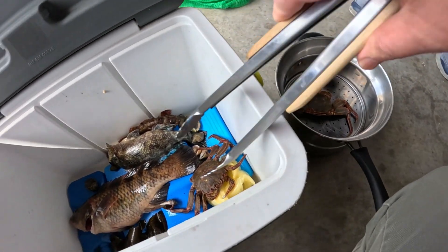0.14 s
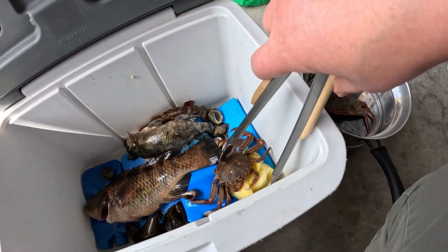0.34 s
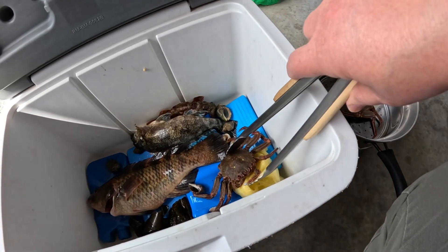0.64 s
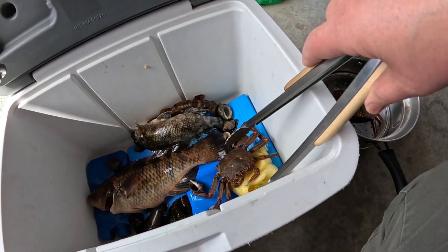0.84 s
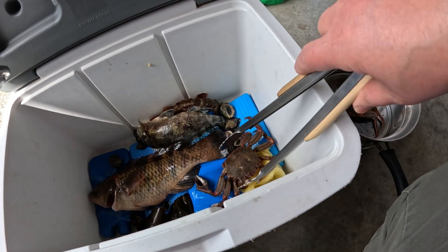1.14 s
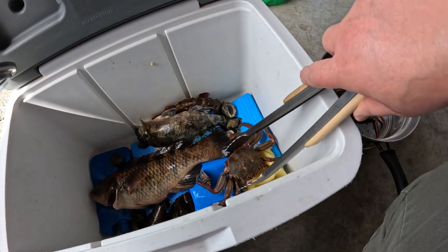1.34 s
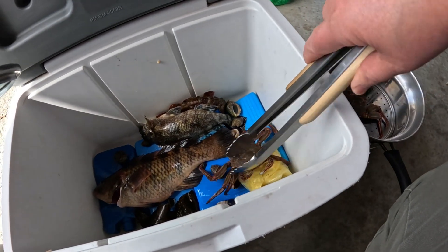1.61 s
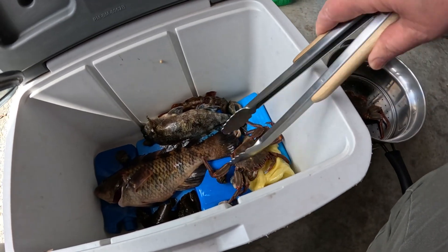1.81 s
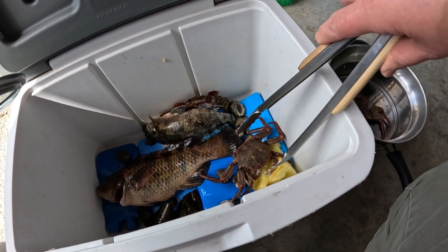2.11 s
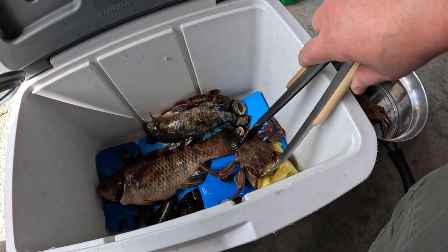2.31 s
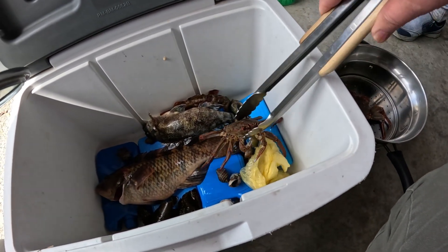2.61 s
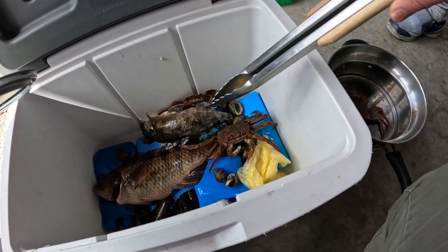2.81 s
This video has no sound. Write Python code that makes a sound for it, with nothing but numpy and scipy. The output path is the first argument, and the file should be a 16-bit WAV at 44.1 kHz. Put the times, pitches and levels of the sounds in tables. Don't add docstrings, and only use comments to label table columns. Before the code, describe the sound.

Close stereo sound of steel tongs chasing a crab in an open cooler: irregular dull thuds and small ticks first, a sharp scrape and ringing snap midway, two more thuds, then thin metallic scratches and chatter.

```python
import sys
import numpy as np
from scipy import signal
from scipy.fft import rfft, irfft, next_fast_len
from scipy.io import wavfile
from scipy.ndimage import map_coordinates

SR = 44100
rng = np.random.default_rng(int(sys.argv[2]) if len(sys.argv) > 2 else 0)


def ratio(d):
    e = np.asarray(d, float) / 20
    return 10 ** e


def log_audio(samples):
    frames = np.atleast_2d(samples).T
    limited = np.clip(frames, -1, 1)
    pcm = np.round(limited * 32767).astype(np.int16)
    wavfile.write(sys.argv[1], SR, pcm)


N = 130095

# frequency in Hz, level in dB.
RUMBLE_COLOUR = [(15, -6), (45, 0), (110, -9), (250, -84)]
# start in seconds, peak level in dB.
JOLTS = [
    (0.389, -27),
    (1.621, -23),
    (1.741, -20.5),
    (2.82, -26),
]
# frequency in Hz, likeness from 0 to 1.
LIKENESS = [(400, 0.93), (1500, 0.76), (6000, 0.8), (12000, 0.83)]
# time in seconds, shifting, dull rustle and fine rustle in dB.
UNREST = [(0, -47.5, -43.5, -55.5), (.19, -42, -42.5, -56.5), (.24, -28.5, -45, -65.5),
          (.42, -31, -53.5, -50), (0.622, -43.5, -51.5, -50), (0.862, -43, -64, -48.5),
          (1.041, -45, -60, -55), (1.2, -42.5, -45, -44), (1.35, -42.5, -53, -55), (1.701, -34, -54, -47),
          (1.839, -42.5, -50, -52.5), (1.946, -54, -73, -64.5), (2.05, -35, -53.5, -62.5),
          (2.237, -34, -57, -60.5), (2.33, -27, -46.5, -46.5), (2.62, -45, -55, -51.5),
          (2.95, -42.5, -46, -54)]
# frequency in Hz, level in dB.
DULL_RUSTLE_COLOUR = [(220, -8), (380, -4), (1030, -1), (2100, -12.5), (3290, -20), (6000, -25.5),
                      (7800, -31.5), (13200, -120)]
# frequency in Hz, level in dB.
FINE_RUSTLE_COLOUR = [(900, -13), (1500, -1), (2200, -9), (3200, -0.5), (9500, -12), (13000, -24),
                      (15500, -61)]
# start in seconds, peak level in dB, damping factor (no unit).
KNOCKS = [(0.209, -1, 0.83), (0.341, 1, 1.3), (0.392, -12, 0.44), (0.504, -17.5, 0.53), (0.529, -17.5, 2),
          (0.601, -20.5, 0.5), (0.696, -15, 1.2), (0.824, -29.5, 1.8), (0.903, -17, 0.76),
          (1.152, -23, 1.26), (1.265, 1.5, 1.37), (1.323, -18.5, 1.05), (1.358, -30, 1.8),
          (1.434, -14, 1.2), (1.449, -2.5, 1.06), (1.523, -19.5, 1.2), (1.614, -20.5, 1.1),
          (1.688, -19.5, 1.1), (1.74, -23.5, 1), (1.974, -2.5, 0.93), (2.14, -1.5, 0.92),
          (2.326, -19, 0.67), (2.348, -14.5, 0.84), (2.362, -23, 0.77), (2.821, -18, 0.85)]
# frequency in Hz, level in dB, 60 dB fade in seconds.
WALL_TONES = [(185.4, -32, 0.78), (220.06, -1.5, 0.23), (232.4, 0.5, .1), (266.5, 2.5, 0.051),
              (290, -4.5, 0.086), (325, -40, 0.45), (624, -19, 0.058), (405, -7, 0.034), (728, -29, 0.1),
              (972, -18.5, 0.046)]
# start in seconds, level in dB.
SWAYS = [(0.213, -12), (0.346, -20.5), (.699, -22.5), (0.902, -10.5), (1.324, -29), (1.451, -17),
         (1.975, -9.5), (2.142, -14.5), (2.351, -27)]
# start in seconds, level in dB, pitch in Hz, 60 dB fade in seconds.
CLAW_TAPS = [
    (2.893, -19, 392, 0.14),
]
# start in seconds, peak level in dB, pitch in Hz.
SHELL_TAPS = [(0.208, -9.5, 1000), (0.341, -22.5, 775), (0.389, -24.5, 1150), (0.404, -22.5, 1530),
              (0.428, -31.5, 1980), (0.902, -16, 1290), (0.919, -22.5, 1730), (1.193, -30.5, 1000),
              (1.266, -23.5, 960), (1.436, -23.5, 890), (1.449, -21.5, 970), (1.519, -24.5, 1230),
              (1.614, -21, 1020), (1.973, -15.5, 1680), (1.996, -29, 1190), (2.139, -18, 1230),
              (2.352, -24, 700), (2.579, -27.5, 1510), (2.653, -33.5, 1720), (2.821, -24, 1050),
              (2.919, -24.5, 2700)]
# frequency in Hz, level in dB.
DULL_COLOUR = [(300, -41), (700, 3), (1200, 5), (1800, -0.5), (3400, -2.5), (9250, -22), (15000, -59)]
# start in seconds, peak level in dB.
TICKS = [(0.39, -11), (0.4918, -21), (0.5943, -19), (0.6916, -23), (1.0683, -19.5), (1.0752, -13.5),
         (1.1303, -17), (1.1564, -16), (1.3232, -23), (1.5193, -8.5), (1.534, -16), (1.5732, -34),
         (1.7845, -24), (2.6279, -19.5), (2.9188, -25), (.111, -32), (.407, -20.5), (.43, -25),
         (1.484, -25)]
# frequency in Hz, level in dB.
BRIGHT_COLOUR = [(290, -38), (500, -1.5), (843, -11), (1020, 2), (2070, -4.5), (3250, 1), (7210, 2.5),
                 (12100, -13.5), (16400, -57.5)]
# start in seconds, length in seconds, level in dB, change in dB.
STROKES = [(1.588, 0.034, -28.5, 0), (1.615, .02, -34.5, -4), (1.64, 0.067, -29.5, -3.5),
           (1.701, 0.047, -40.5, -4), (2.284, 0.033, -47.5, 6.5), (2.344, 0.016, -36.5, -11),
           (2.44, 0.021, -28, 1), (2.463, 0.047, -47, 14.5), (2.516, 0.066, -29.5, -18.5),
           (2.675, 0.014, -34, -7), (2.688, 0.063, -32, -1.5), (2.744, 0.051, -37.5, -10.5),
           (2.804, 0.074, -49, -3.5)]
# start in seconds, peak level in dB, pitch in Hz.
CATCHES = [(0.2083, -14, 4150), (1.5762, -14.5, 5270), (1.5874, -13, 5100), (1.5914, -19, 5870),
           (1.6002, -7, 6590), (1.6085, -21, 6480), (1.6142, -12, 6200), (1.6369, -12, 4380),
           (1.6415, -9.5, 6700), (1.6567, -21, 7250), (1.672, -15, 6920), (1.6785, -4.5, 4960),
           (1.6826, -13, 5870), (1.6869, -5, 3750), (2.2842, -21.5, 9500), (2.3156, -24, 6900),
           (2.3336, -22, 4230), (2.3461, -35, 7290), (2.3537, -21, 5300), (2.3632, -17.5, 4100),
           (2.408, -38, 5720), (2.4244, -24, 5530), (2.4448, -15, 6440), (2.4478, -9, 8500),
           (2.4529, -5.5, 6000), (2.456, -24, 6290), (2.4844, -18, 9360), (2.4904, -22, 7740),
           (2.4966, -17, 3600), (2.5197, -20, 6390), (2.5338, -17, 7430), (2.556, -23, 7360),
           (2.6741, -18.5, 6800), (2.6848, -15, 7600), (2.6934, -14, 6300), (2.6977, -9.5, 8000),
           (2.7048, -18, 4460), (2.7074, -13.5, 7200), (2.713, -16, 6790), (2.7262, -5.5, 7800),
           (2.73, -19, 3500), (2.7376, -2, 3460), (2.7583, -11, 3530), (2.8195, -40, 3660),
           (2.8346, -17, 4500), (2.8492, -17.5, 4700), (2.8573, -17, 4650), (2.8664, -24.5, 5000),
           (2.8847, -28, 4980)]
# frequency in Hz, level in dB.
TEETH_TONES = [(4330, 2.5), (4800, 1), (5280, -6), (6000, -1), (6700, 4), (7300, 3), (7890, -1), (9380, 0),
               (11800, -1)]
# frequency in Hz, level in dB.
ARM_TONES = [(3240, 0), (3400, -4), (3470, -6), (3640, -5), (3775, -7), (4126, -8), (4380, -4), (5290, -11),
             (6290, -13), (6620, -11)]
# start in seconds, peak level in dB.
SNAPS = [(1.702, -9.5), (2.6997, -24), (2.7117, -21.5), (2.7308, -10.5), (2.738, -27), (2.7502, -27),
         (2.7604, -17), (2.768, -24.5)]
# frequency in Hz, 60 dB fade in seconds.
BOX_ECHO = [(300, 0.2), (1000, 0.097), (4000, 0.042), (14000, 0.049)]
# frequency in Hz, level in dB.
SPREAD_COLOUR = [(1500, -41), (5000, -7), (9000, -16.5), (13000, 0.5)]
# frequency in Hz, level in dB.
MIC_COLOUR = [(9700, 1), (10200, -8.5), (14500, 1.5), (16400, -21)]


def unit(x):
    return x / np.sqrt(np.mean(x ** 2) + 1e-20)


def seconds_axis(length):
    return np.arange(length) / SR


def along(points, hz):
    f, value = np.transpose(points)
    return np.interp(np.log(hz + 1), np.log(f + 1), value)


def wobble(rate):
    knots = rng.standard_normal(int(N * rate / SR) + 4)
    return map_coordinates(knots, [np.arange(N) * rate / SR])


def filtered(x, response):
    m = next_fast_len(N + SR // 2)
    return irfft(rfft(x, m) * response(np.fft.rfftfreq(m, 1 / SR)), m)[..., :N]


def causal(points):
    level = ratio(along(points, np.fft.rfftfreq(2048, 1 / SR)))
    cepstrum = irfft(np.log(level + 1e-6))
    cepstrum[1:1024] *= 2
    cepstrum[1025:] = 0
    click = irfft(np.exp(rfft(cepstrum)))[:1024]
    return click / np.linalg.norm(click)


def through(x, answer):
    return signal.fftconvolve(x, answer)[:N]


def add(track, s, sound):
    part = track[max(round(s * SR), 0):][:len(sound)]
    part += sound[:len(part)]


def ring(hz, db, t60, seconds):
    t = seconds_axis(int(seconds * SR))
    return ratio(db[:, None] - 60 * t / t60[:, None]) * np.sin(2 * np.pi * hz[:, None] * t)


def tone(hz, db, t60, rise_s):
    t = seconds_axis(SR // 2)
    return ratio(db - 60 * t / t60) * (1 - np.exp(-t / rise_s)) * np.sin(2 * np.pi * hz * t)


def rush(spectrum):
    def shares(hz):
        turn = np.arccos(np.clip(along(LIKENESS, hz), -1, 1)) / 2
        return ratio(along(spectrum, hz)) * np.array([np.cos(turn), np.sin(turn)])

    mid, side = filtered(rng.standard_normal((2, N)), shares)
    return unit(np.array([mid + side, mid - side]))


def unrest(column):
    rows = np.transpose(UNREST)
    return np.interp(seconds_axis(N), rows[0], rows[column])


def bursts(events, colour, trim_db, t60):
    out, t = np.zeros(N), seconds_axis(SR // 10)
    for s, db in events:
        noise = rng.standard_normal(len(t))
        add(out, s, ratio(db + trim_db - 60 * t / t60) * (1 - np.exp(-t / 0.0019)) * noise)
    return through(out, causal(colour))


def pitched_bursts(events, colour, trim_db, t60, sharpness, broad_db):
    out, t = np.zeros(N), seconds_axis(2048)
    f = np.fft.rfftfreq(len(t), 1 / SR)
    envelope = ratio(-60 * t / t60) * (1 - np.exp(-t / 0.00058))
    for s, db, hz in events:
        burst = rng.standard_normal(len(t)) * envelope
        width = 1j * f * hz / sharpness
        peak = width / (hz * hz - f * f + width)
        add(out, s, ratio(db + trim_db) * irfft(rfft(burst) * (peak + ratio(broad_db))))
    return through(out, causal(colour))


def camera():
    level_db = -59.5 + 0.32 * (unrest(1) + 47.5) + 3.3 * wobble(4.56)
    out = ratio(level_db) * rush(RUMBLE_COLOUR)[0]
    for s, db in JOLTS:
        add(out, s, tone(47.2, db + 1.0, t60=0.07, rise_s=0.0041))
    return out


def dull_rustle():
    return ratio(unrest(2) + 0.98 * wobble(25.65)) * rush(DULL_RUSTLE_COLOUR)


def leg_rustle():
    return ratio(unrest(3) + 2.9 * wobble(140)) * rush(FINE_RUSTLE_COLOUR)


def knocks():
    push_s, lag_s, trim_db = 0.0033, 0.00244, -7
    scatter_db, detune, slap_db = 1.4, 0.016, 0.5
    slap_hz, slap_s, slap_width_s = 235.8, 0.0064, 0.0033
    out, t = np.zeros(N), seconds_axis(SR // 2)
    hz, mode_db, t60 = np.transpose(WALL_TONES)
    push = 1 - np.exp(-(t / push_s) ** 2)
    slap = np.exp(-((t - slap_s) / slap_width_s) ** 2) * np.sin(2 * np.pi * slap_hz * t)
    for s, db, damping in KNOCKS:
        level_change, pitch_change = rng.standard_normal((2, len(WALL_TONES)))
        tones = ring(hz * (1 + detune * pitch_change), mode_db + scatter_db * level_change,
                     t60 / max(damping, .3), .5).sum(0)
        add(out, s + lag_s, ratio(db + trim_db) * push * tones)
        add(out, s + lag_s, ratio(db + trim_db + slap_db) * slap)
    return out


def shifting():
    hz, mode_db, t60 = np.transpose(WALL_TONES)
    nudges = rng.standard_normal(N) * ratio(3.2 * wobble(39.99))
    hum = through(nudges, ring(hz, mode_db, t60 / 1.5, 0.45).sum(0))
    return ratio(unrest(1)) * unit(hum)


def box():
    out = knocks() + shifting()
    for s, db in SWAYS:
        add(out, s, tone(138, db, t60=0.3, rise_s=0.022))
    for s, db, hz, t60 in CLAW_TAPS:
        add(out, s, tone(hz, db - 5.5, t60, rise_s=0.00082))
    wall_cut_hz = 94
    return filtered(out, lambda f: (1j * f / (1j * f + wall_cut_hz)) ** 4)


def inside(x):
    hz, _, noise = signal.stft(rng.standard_normal((2, SR // 4)), SR, nperseg=128)
    _, t, _ = signal.stft(np.zeros(SR // 4), SR, nperseg=128)
    fading = noise * ratio(-60 * t / along(BOX_ECHO, hz)[:, None])
    tail = signal.istft(fading, SR, nperseg=128)[1]
    delayed = np.pad(x, (40, 0))[None]
    return signal.fftconvolve(delayed, tail / np.linalg.norm(tail[0]), axes=1)[:, :N]


def spread(x):
    t = seconds_axis(SR // 50)
    scatter = rng.standard_normal(len(t)) * np.exp(-t / 0.003)
    scattered = through(x, scatter / np.linalg.norm(scatter))
    return filtered(scattered, lambda hz: ratio(along(SPREAD_COLOUR, hz))) * np.array([[1], [-1]])


def shell_taps():
    return pitched_bursts(SHELL_TAPS, DULL_COLOUR, trim_db=1.0, t60=0.021, sharpness=2.83, broad_db=-4.5)


def leg_ticks():
    return bursts(TICKS, BRIGHT_COLOUR, trim_db=-6.5, t60=0.021)


def arms():
    hz, db = np.transpose(ARM_TONES)
    t60 = .039 * (hz[1] / hz) ** 2.1
    t = seconds_axis(int(.1 * SR))
    answer = ring(hz, db, t60, .1).sum(0) * (1 - np.exp(-t / .0004))
    return answer / np.linalg.norm(answer)


def teeth():
    hz, db = np.transpose(TEETH_TONES)
    answer = ring(hz, db, np.full(len(hz), 0.011), .05).sum(0)
    return answer / np.linalg.norm(answer)


def swish():
    brush = np.exp(-((seconds_axis(N) - 2.11) / .03) ** 2) * rng.standard_normal(N)
    return through(ratio(-51) * brush, arms())


def scrape():
    grit_per_s, grit_db, clump_db, edge_s = 6000, 2.5, 1.8, .004
    t, pressure = seconds_axis(N), np.zeros(N)
    for s, length, db, fade_db in STROKES:
        edges = np.clip(np.minimum(t - s, s + length - t) / edge_s, 0, 1)
        pressure += ratio(db + fade_db * (t - s) / length) * edges
    chance, direction, size = rng.random((3, N))
    grains = (chance < grit_per_s / SR) * np.sign(direction - .5) * ratio(-grit_db * np.log(1 - .96 * size))
    rough = unit(unit(grains) + 0.65 * rng.standard_normal(N))
    grit = pressure * rough * ratio(clump_db * wobble(120))
    shell = ratio(-3.5) * through(grit, causal(BRIGHT_COLOUR))
    return shell + ratio(-1.5) * through(grit, teeth()) + ratio(-12.5) * through(grit, arms())


def catches():
    return pitched_bursts(CATCHES, BRIGHT_COLOUR, trim_db=-5, t60=0.019, sharpness=3.23, broad_db=-10.5)


def snaps():
    bounce_s, shrink, loss_db = .0163, .7, 5
    out, t = np.zeros(N), seconds_axis(SR // 50)
    first_s, first_db = SNAPS[0]
    hits = list(SNAPS)
    for k in range(1, 6):
        delay_s = bounce_s * (1 - shrink ** k) / (1 - shrink)
        hits.append((first_s + delay_s, first_db - loss_db * k))
    for s, db in hits:
        add(out, s, ratio(db + .5) * np.exp(-t / 0.0017) * rng.standard_normal(len(t)))
    return through(out, arms()) + ratio(-13) * through(out, causal(BRIGHT_COLOUR))


def scene():
    background = dull_rustle() + leg_rustle()
    walls = box()
    low = (walls + camera()) * ratio([[-.15], [.15]])
    sharp = shell_taps() + leg_ticks() + swish() + scrape() + catches() + snaps()
    echo = ratio(-9) * inside(sharp) + ratio(-28.0) * inside(walls)
    leaning = sharp * ratio([[-1], [1]])
    return background + low + echo + leaning + spread(sharp)


def low_pass(x):
    return signal.sosfilt(signal.butter(12, 16460, fs=SR, output="sos"), x)


def record(dry):
    x = filtered(dry, lambda hz: ratio(along(MIC_COLOUR, hz)))
    ceiling = .82
    mix = x / (1 + np.abs(x / ceiling) ** 10) ** (1 / 10)
    return low_pass(mix)


dry = scene()
out = record(dry)
log_audio(out)
```